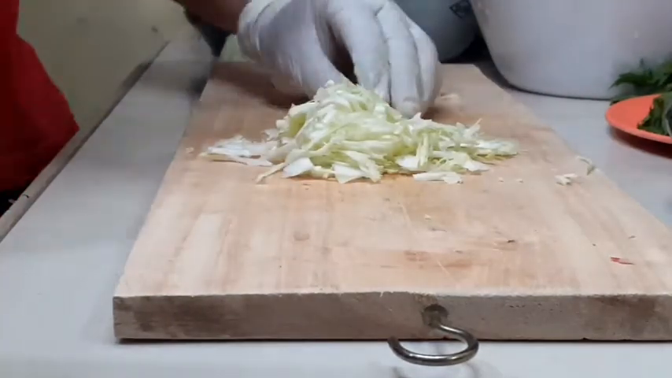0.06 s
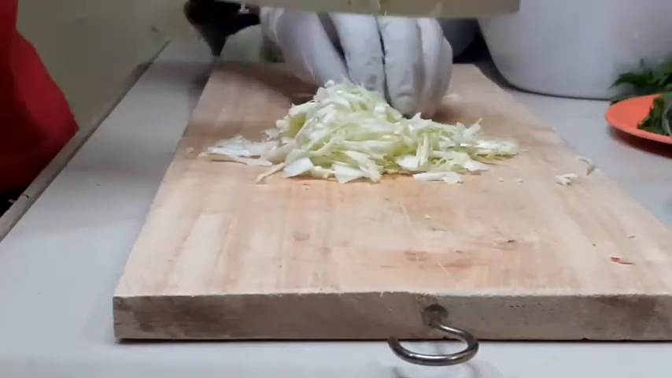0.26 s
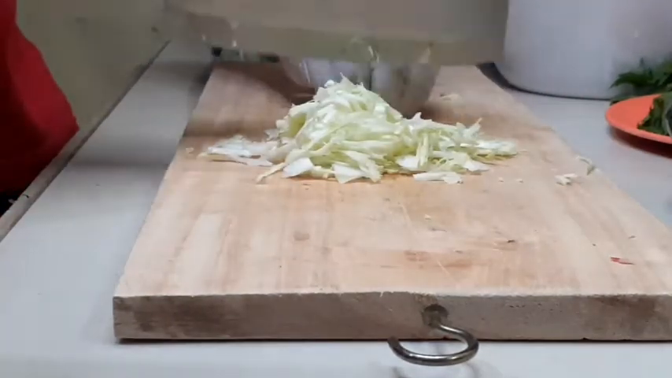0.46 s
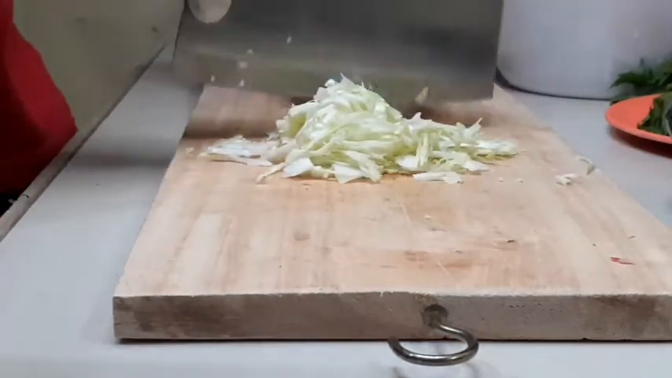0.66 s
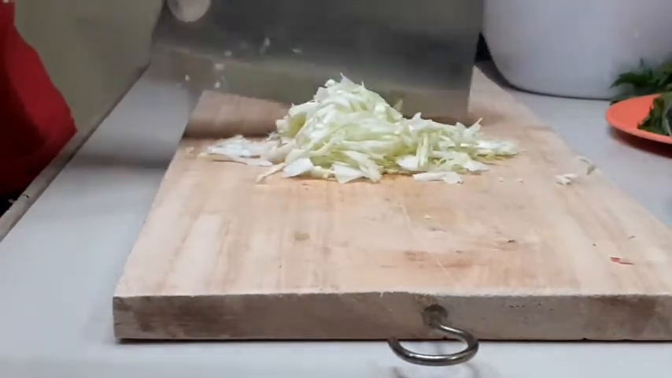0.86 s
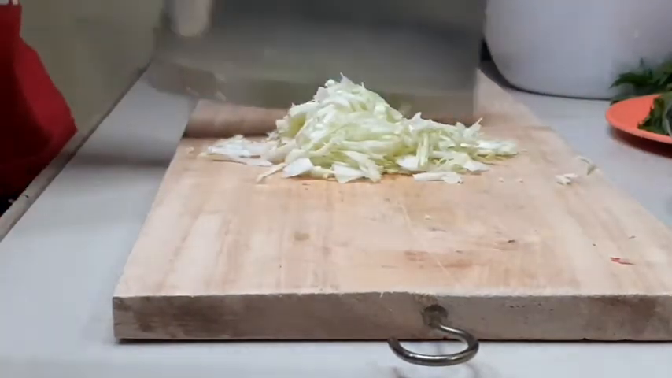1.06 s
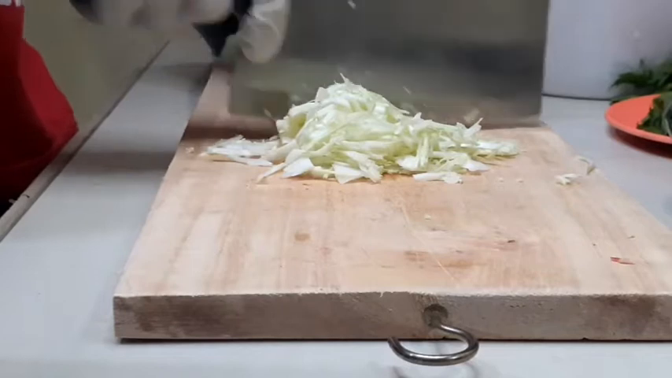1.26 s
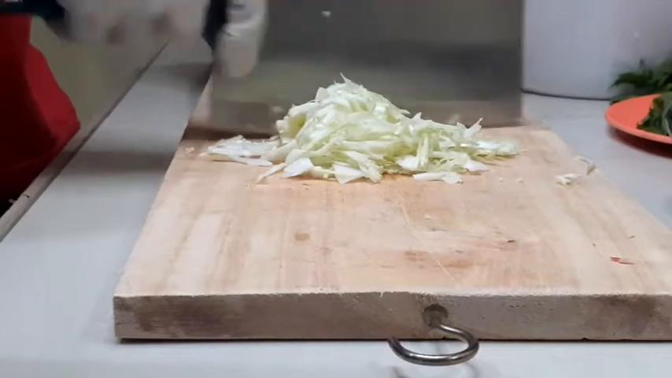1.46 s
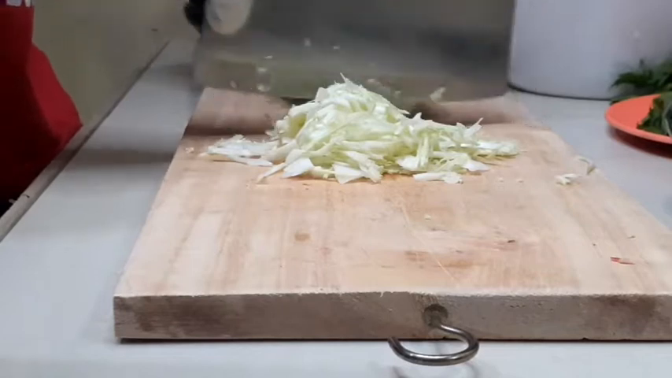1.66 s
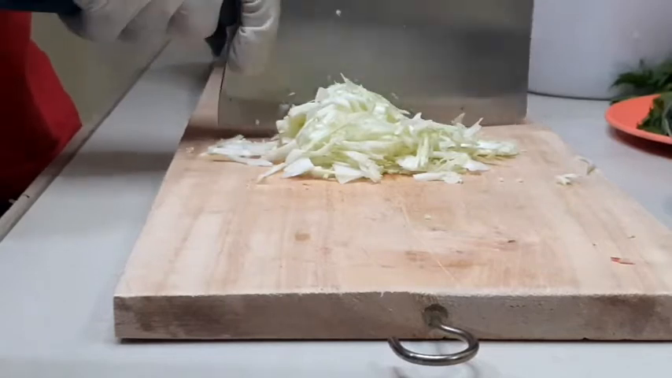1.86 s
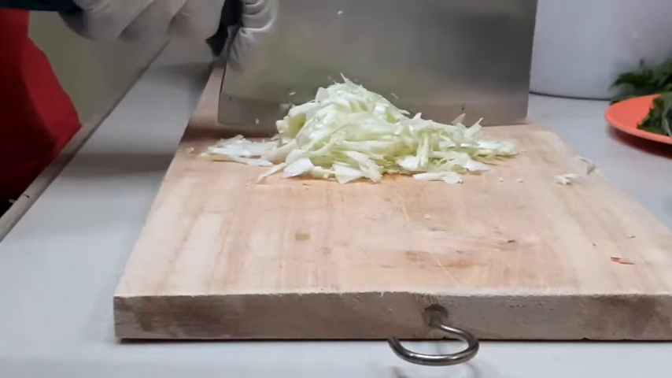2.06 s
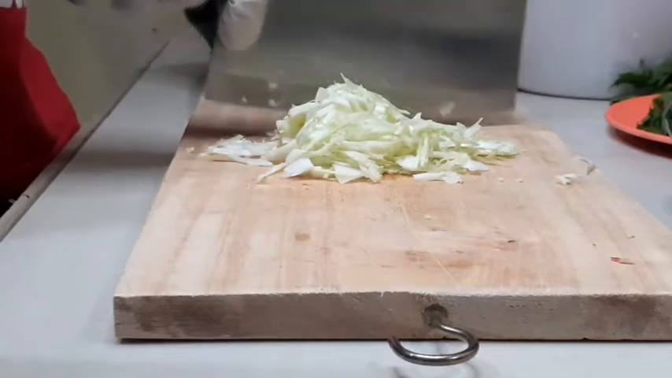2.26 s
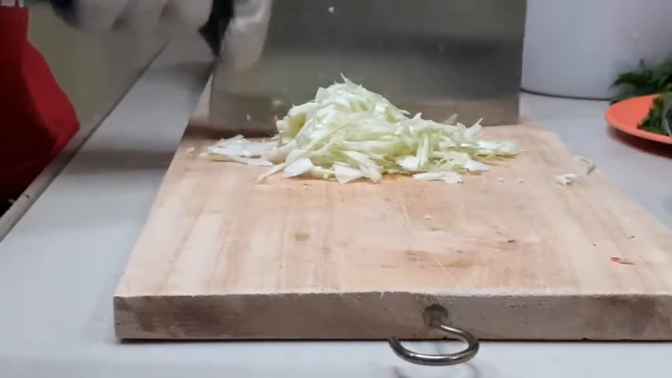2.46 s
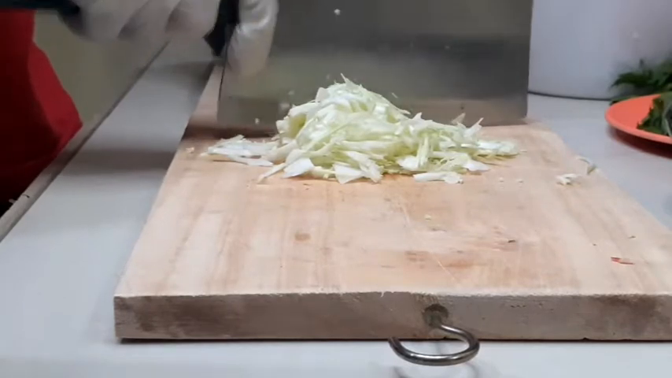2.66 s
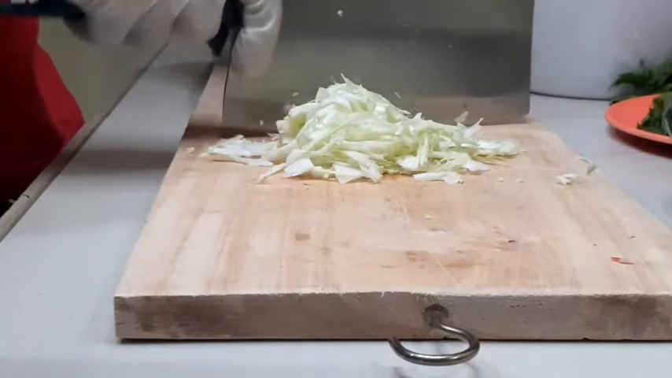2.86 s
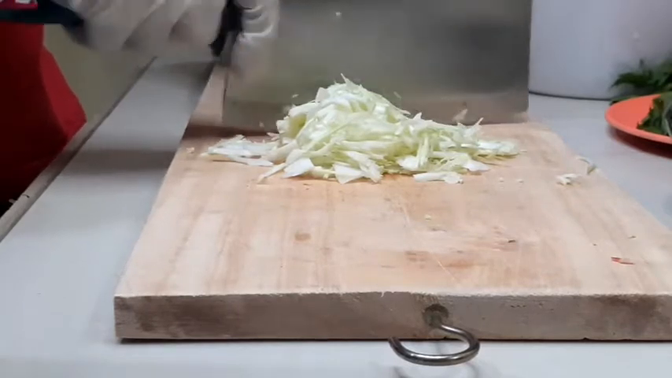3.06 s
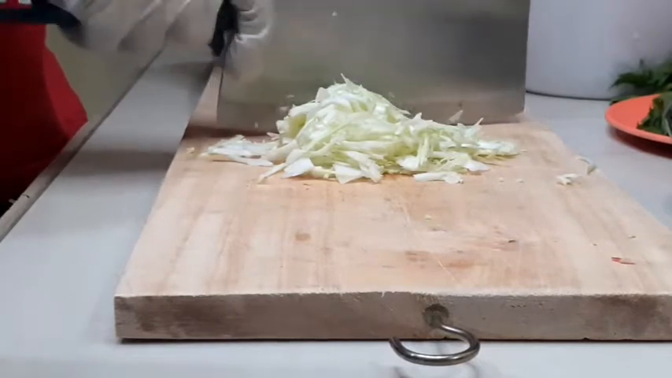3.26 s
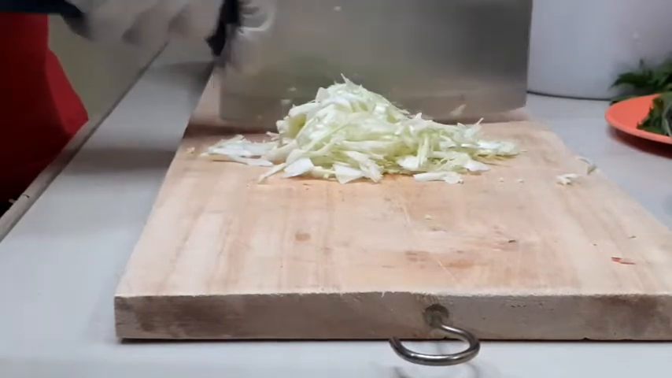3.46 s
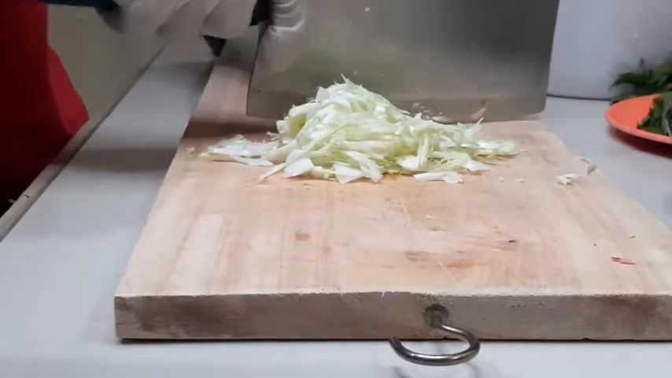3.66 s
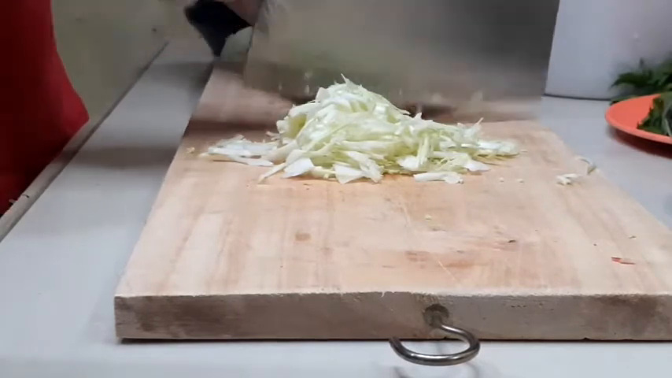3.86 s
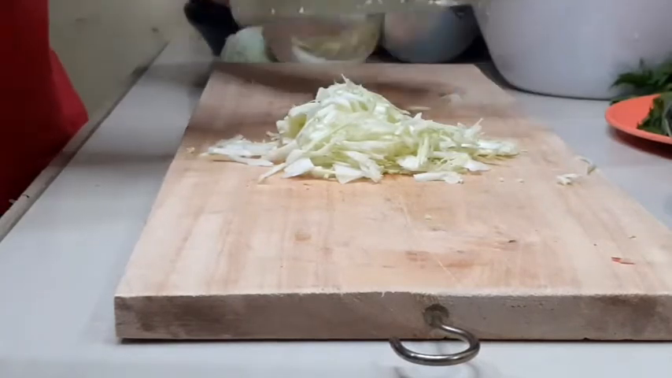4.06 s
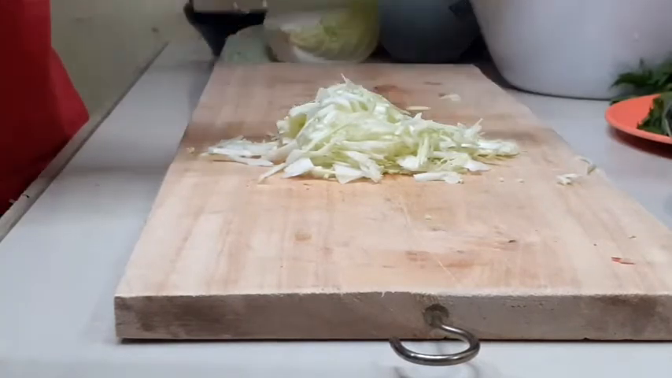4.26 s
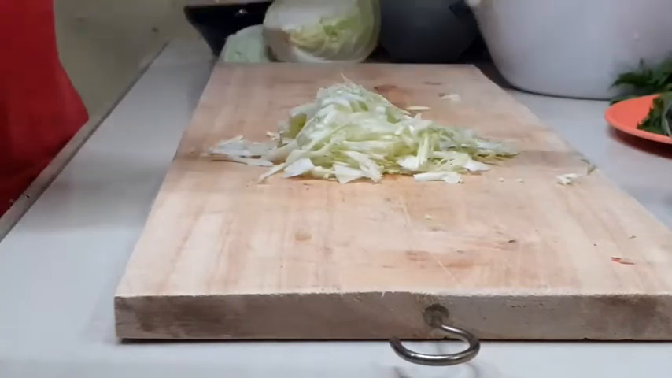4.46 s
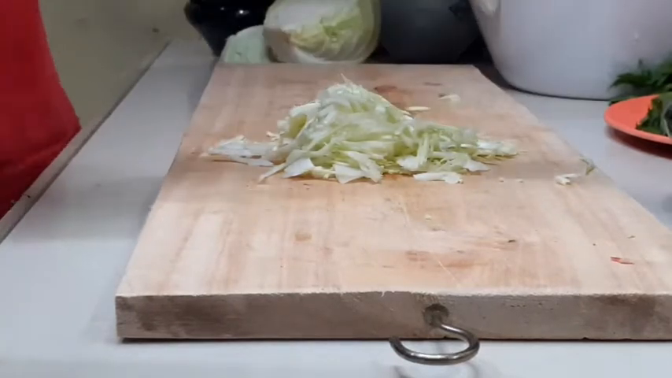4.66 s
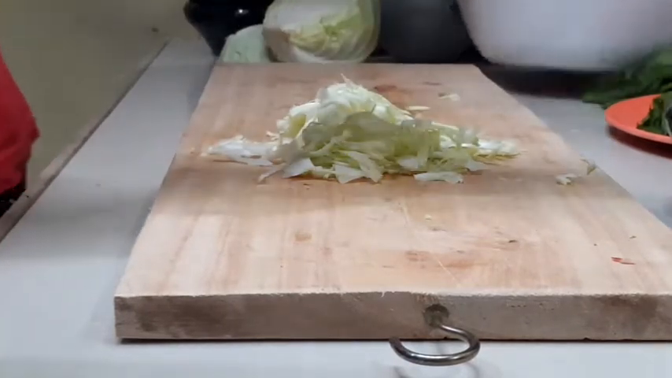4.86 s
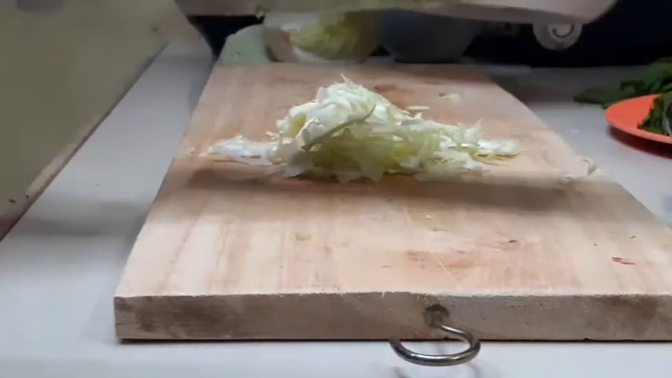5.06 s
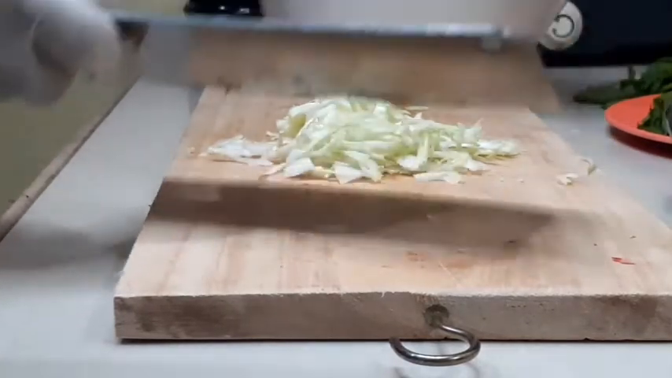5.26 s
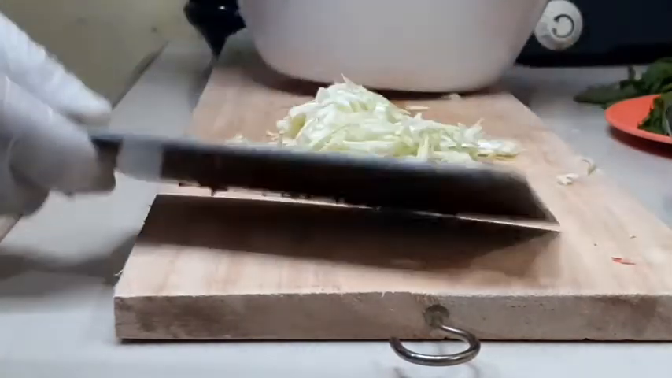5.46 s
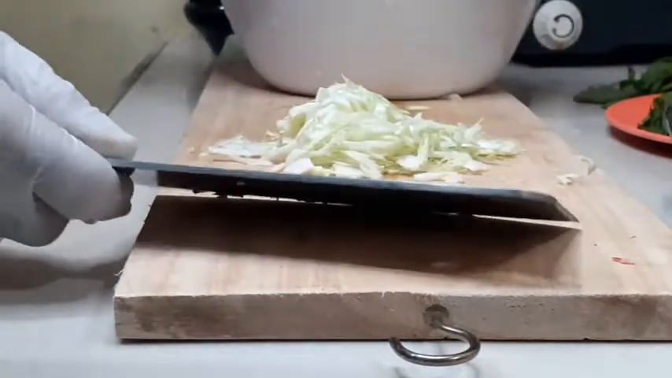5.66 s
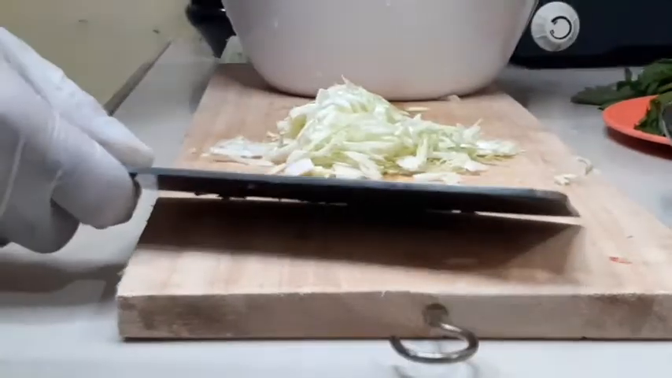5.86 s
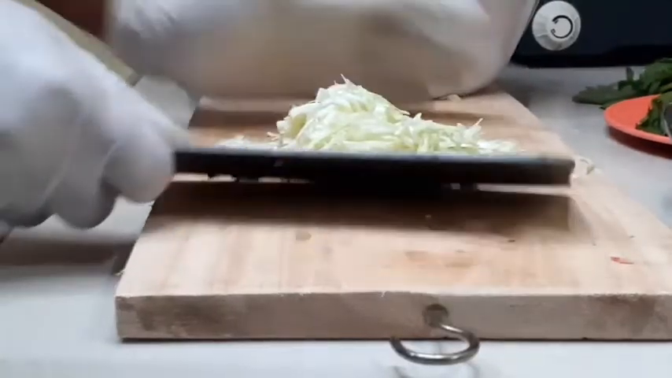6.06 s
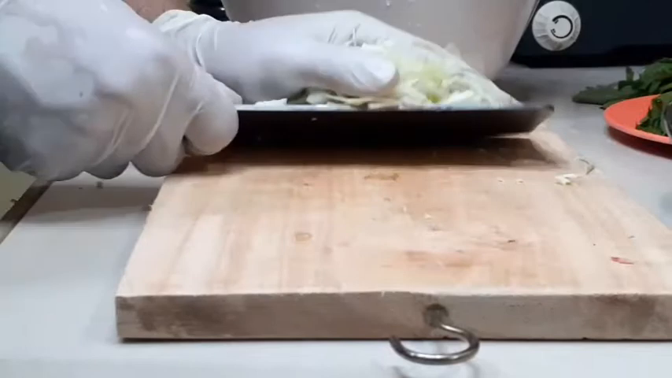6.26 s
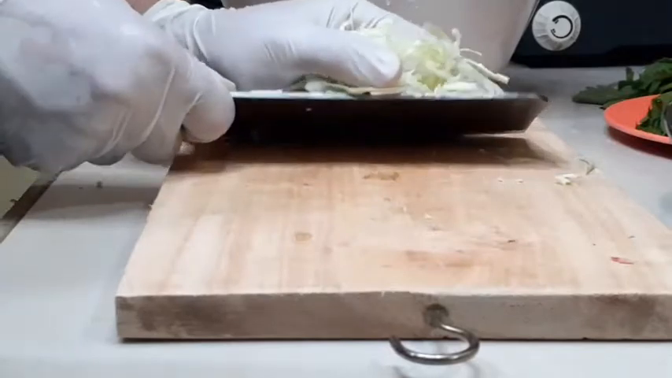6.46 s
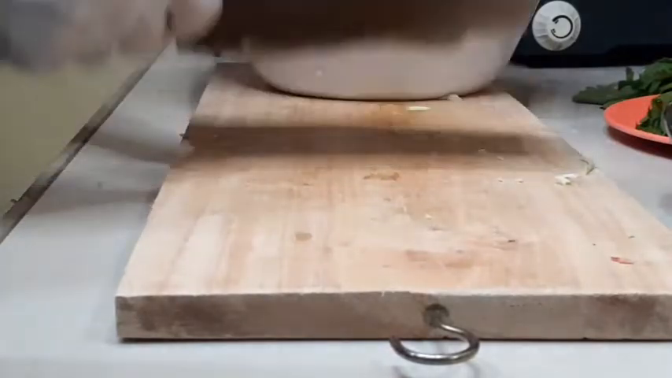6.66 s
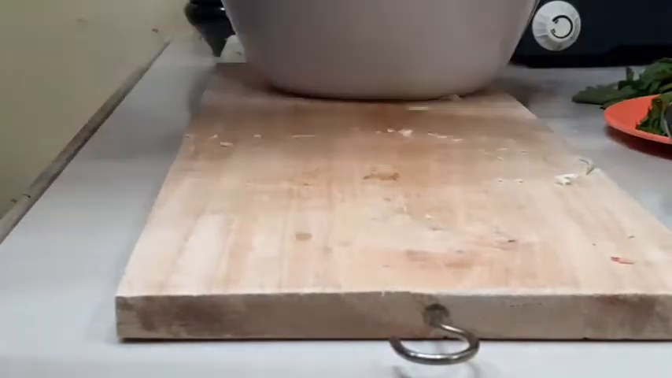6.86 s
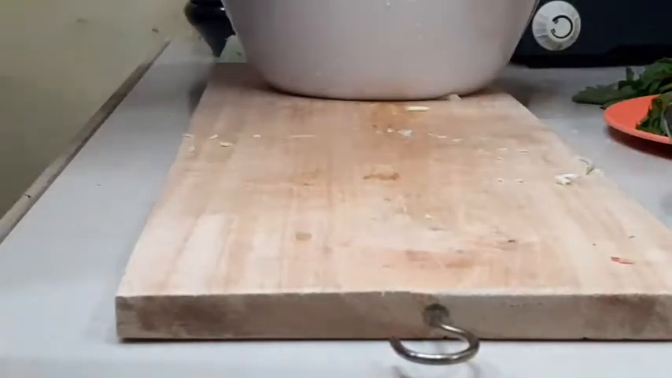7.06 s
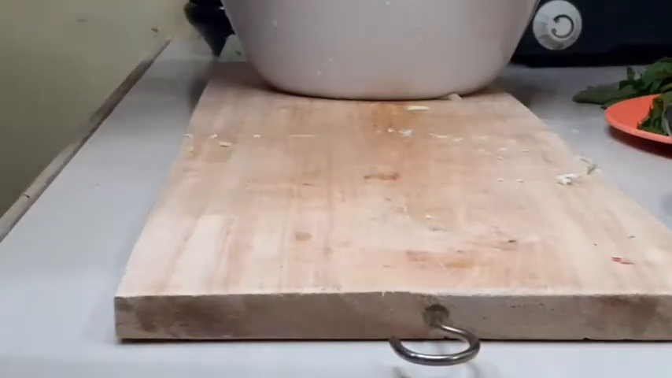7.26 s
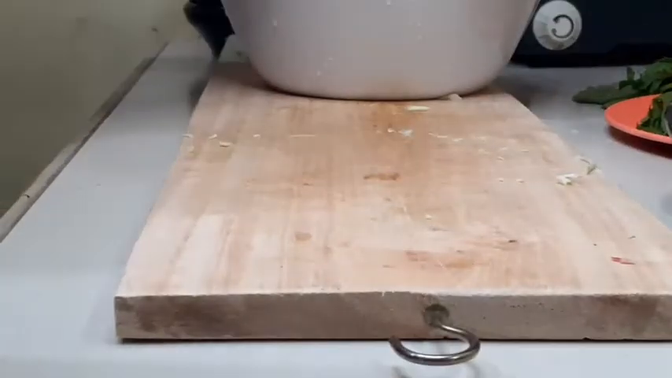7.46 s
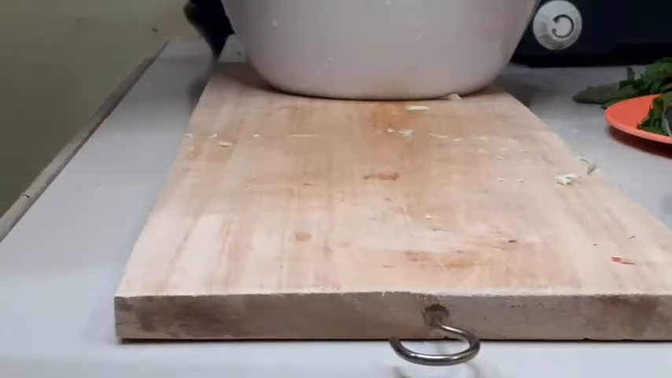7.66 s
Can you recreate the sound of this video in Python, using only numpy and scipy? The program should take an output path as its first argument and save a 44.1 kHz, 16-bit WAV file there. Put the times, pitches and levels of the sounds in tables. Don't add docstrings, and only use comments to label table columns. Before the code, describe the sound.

A hard-walled kitchen with low traffic rumble leaking in, heard close from the left of a wooden board. Around 0.8-0.95 s a glove squeaks faintly on steel. A heavy knife strikes at 1.05 s, loud and crunchy, with a soft touch just before, then at 1.4, 1.7, 2.3, 2.55, 2.75, a dull one at 3.0 and a heavy last chop at 3.2. Each is a short woody knock with leafy crackle and a brief room tail. Small crunches fade by 3.7. Leaves rustle at 4.3-4.6 over a low motor hum, strongest near 4.7. Flat steel clacks hard at 5.2, then more lightly at 5.5 with a rub. At 6.0-6.2 gritty blade scrapes and rustling gather the heap. A faint fan tone wavers, with a tiny high brake squeal near 7.0. Leaves drop in a ringing bowl at 7.35, a last clump at 7.55.

```python
import sys
import numpy as np
from scipy import signal
from scipy.fft import rfft, irfft, next_fast_len
from scipy.io import wavfile
from scipy.ndimage import uniform_filter1d

SR = 44100
rng = np.random.default_rng(int(sys.argv[2]) if len(sys.argv) > 2 else 0)


def pcm_store(signal):
    levels = np.round(np.clip(np.atleast_2d(signal), -1, 1) * 32767)
    wavfile.write(sys.argv[1], SR, levels.astype(np.int16).T)


def boost(x):
    u = np.asarray(x, float) / 20
    return 10 ** u


N = 340011
T = np.arange(N) / SR

# frequency in Hz, level in dB per Hz.
STREET_FLOOR = [(15, -54), (25, -28), (68, -5.5), (114, -5), (190, -7.5), (335, -2), (384, -27),
                (439, -13.5), (489, -17.5), (887, -35), (962, -42.5), (3160, -45.5), (8590, -42),
                (14800, -60), (16000, -70)]
STREET_FLOOR_DB = -61.5
# nearest in seconds, drone in dB, swell in seconds, rumble in dB, tyres in dB.
PASSING_VEHICLES = [(.28, -37.5, 0.22, -4, -38), (.4, -39.5, 0.21, -13, -30), (.56, -64.5, 0.1, 13.5, -3),
                    (.8, -53.5, 0.22, 5, -26), (1.0, -45.5, 0.11, -8, -10.5), (2.08, -61, 0.17, -14, 4.5),
                    (2.22, -41.5, 0.28, -5.5, -13.5), (3.75, -58, 0.62, 4, -2.5),
                    (3.98, -70.5, 0.51, -3.5, 7.5), (4.249, -57, 0.18, -0.5, -8),
                    (5.099, -52.5, 0.74, -3.5, -3.5), (5.95, -47, 0.23, -15.5, -21),
                    (6.5, -43.5, 0.41, -27, -19), (6.8, -48, 0.32, -4.5, -13), (7.1, -46, 1, -6, -12.5),
                    (7.599, -49, 0.2, 6, -15), (7.71, -54, 0.068, 17.5, -6)]
# rumble, drone, tyres, hiss in dB.
BETWEEN_VEHICLES_DB = (-56.5, -69.5, -87, -100)
# peak in seconds, level in dB, rise in seconds, fall in seconds.
DISTANT_HISSES = [(0.978, -69.5, 0.089, 0.65), (5.1, -80, 0.69, 0.47), (5.92, -68.5, 0.11, 0.12),
                  (6.6, -78, 1, 1), (7.2, -69.5, 1, 1)]
# peak in seconds, level in dB, rise in seconds, fall in seconds.
FAR_TYRES = [(0.321, -74, 0.15, .25), (.56, -81, .05, .05)]

# start in seconds, length in seconds, first Hz, last Hz, peak in dB.
GLOVE_SQUEAKS = [
    (0.788, 0.03, 3600, 4050, -71),
    (0.812, 0.055, 4080, 3550, -65),
    (0.872, 0.04, 3000, 2000, -73.5),
    (0.947, 0.04, 757, 850, -70.5),
]
GLOVE_OVERTONES_DB = (9.5, -9.5)
# start in seconds, peak in dB, length in ms, part under 3.5 kHz in dB.
LEAF_BURSTS = [(0.8782, -63, 56, -19), (0.945, -55.5, 22, 8), (1.025, -35, 62, -3.5),
               (1.345, -36.5, 59, 5.5), (1.368, -28.5, 14, -9.5), (1.604, -63, 130, -11),
               (1.653, -34, 47, 6.5), (1.658, -44, 4.8, 15), (2.301, -37, 30, 8), (2.5344, -31, 27, 0),
               (2.732, -26, 12, 7.5), (2.9598, -31.5, 29.4, 5), (3.171, -42.5, 24, -52),
               (3.36, -58, 45, -6.5), (3.385, -37.5, 13, 4.5), (3.442, -36.5, 5.6, -1),
               (3.709, -43.5, 9.4, 3.5), (4.3557, -48, 26, -3), (4.415, -39.5, 8.2, 0),
               (4.596, -37, 12, 1.5), (5.217, -22.5, 37, 8.5), (5.441, -35, 24, 14.5), (5.908, -54, 15, -6),
               (5.99, -47, 9.2, -1), (6.1043, -31, 8, 5.5), (6.21, -45, 8, -7), (6.4272, -60.5, 18, 2.5),
               (7.56, -58.5, 21, 22)]
# frequency in Hz, level in dB per Hz.
BURST_COLOUR = [(350, -27), (600, 11), (1030, 9), (1440, 4), (3120, -0.5), (6610, -7.5), (10200, -11.5),
                (14000, -10), (15800, -12.5), (16500, -37)]

# start in seconds, peak in dB, contact in ms, low modes in dB, high modes in dB.
KNIFE_KNOCKS = [
    (1.04, -24, 0.71, -30, 23),
    (1.051, 2, 0.69, -5.5, 15),
    (1.392, -5, 0.19, -1.5, 5),
    (1.684, -9, 0.2, -1, 2.5),
    (2.314, -4, 0.075, -5.5, 4.5),
    (2.546, 2, 0.11, -6.5, 9.5),
    (2.753, -8, 0.13, -1.5, 1),
    (2.99, -16, 0.31, 4.5, -11),
    (3.176, 3.5, 1, -8.5, 11.5),
]
# start in seconds, peak in dB, contact in ms,
# low modes in dB, high modes in dB.
STEEL_CLACKS = [
    (4.291, -41, 0.51, -16, 14),
    (5.218, 2, 0.12, -6.5, 4),
    (5.44, -25.5, 0.24, -2, 21.5),
    (5.474, -34, 0.2, -18, 5),
    (5.485, -8.5, 0.36, -6.5, 7),
    (7.331, -32, 0.34, -12, 5),
    (7.56, -46, 0.5, -27, 5),
]
# frequency in Hz, level in dB, t60 in seconds.
BOARD_MODES = [(108, -17.5, 0.11), (150, -17, 0.046), (198.5, -10.5, 0.028), (301, 2, 0.049),
               (376, -5, 0.062), (442, -2, 0.051), (552, -4, 0.055), (609.4, -5, 0.043), (736, -4, 0.05),
               (795, -5.5, 0.044), (883, 0.5, 0.029), (970, -5.5, 0.04), (1112, -4, 0.023),
               (1274, -10, 0.035), (1400, -11, 0.03), (1600, -9.5, 0.025), (1676, -12.5, 0.03),
               (1864, -13.5, 0.015), (2205, -11.5, 0.0066), (3050, -14.5, 0.0045), (4400, -14.5, 0.0013)]
# frequency in Hz, level in dB, t60 in seconds.
STEEL_MODES = [(107.4, -25.5, 0.166), (198, -13, 0.08), (303, -1, 0.029), (365, -3, 0.084),
               (439, -6.5, 0.038), (577, 4, 0.024), (688, -4, 0.033), (724, -8, 0.032), (897, -22, 0.023),
               (1278, -7.5, 0.016), (1570, -40, 0.0162), (1770, -15.5, 0.04), (2490, -15.5, 0.011),
               (3100, -10, 0.0044), (3600, -15.5, 0.017), (4140, -21, 0.0077), (6550, -26.5, 0.0018),
               (11700, -26.5, 0.00092)]
CONTACT_RISE_S = 0.0003
SETTLE_S, SETTLE_DB = 0.025, -4.5

# time in seconds, upper orders in dB.
MOTOR_LOAD = [(3.298, -86), (3.7, -59), (4.001, -63), (4.2, -52.5), (4.43, -57), (4.68, -53), (4.95, -64),
              (5.2, -64.5), (5.801, -80)]
# multiple of the turning rate, level in dB.
MOTOR_UPPER_ORDERS = [(2, 1.5), (3, -3.5), (4, 3), (6, -16.5), (8, -11)]
# peak in seconds, level in dB, rise in seconds, fall in seconds.
MOTOR_FIRST_ORDER = [
    (4.05, -57, 0.64, 0.36),
    (4.75, -46, 0.65, 0.57),
    (5.3, -58, 0.49, .7),
]
MOTOR_HZ = 53.9

TOUCH_TIMES_S = [3.3, 3.443, 4.276, 4.277, 4.292, 4.293, 4.598, 4.599, 5.474, 5.485, 5.486, 5.49, 5.517,
                 6.022, 6.118, 7.332, 7.343, 7.56, 7.561, 7.562]
# frequency in Hz, level in dB, t60 in seconds.
TOUCH_NOTES = [(1630, -41.5, 0.025), (3940, -60.5, .03), (1150, -54, 0.016), (2030, -59, 0.022),
               (1307, -48.5, 0.15), (655, -45, 0.026), (2100, -45, 0.023), (2670, -45, 0.014),
               (579, -22, 0.027), (610, -14, 0.029), (364, -16, 0.046), (2430, -37, 0.098),
               (481.48, -16, 0.014), (1210, -39, 0.082), (883, -40, 0.14), (1125, -47, .04),
               (2130, -44, 0.028), (1160, -60, 0.041), (1900, -43, 0.033), (2400, -42.5, 0.049)]

# frequency in Hz, level in dB per Hz.
RUSTLE_COLOUR = [(1760, -32), (3000, -19.5), (3740, 0.5), (4740, -10.5), (5400, -4.5), (10400, -8),
                 (13600, -7), (14800, -3), (16200, -2), (16500, -32)]
# peak in seconds, level in dB, rise in seconds, fall in seconds.
LEAF_PUSHES = [(4.37, -53.5, 0.12, 0.086), (4.444, -47, 0.091, 0.06), (4.531, -39.5, 0.12, 0.08),
               (4.62, -62.5, .04, 0.34), (5.443, -40, 0.0071, 0.047), (5.491, -33.5, 0.021, 0.077),
               (5.80, -66.5, 0.04, 0.089), (5.99, -53.5, 0.08, .05), (6.05, -45.5, 0.091, 0.078),
               (6.09, -50.5, 0.036, .04), (6.12, -41.5, 0.065, 0.063), (6.165, -45.5, 0.057, .05),
               (6.2, -45.5, 0.086, 0.019), (7.373, -49.5, 0.045, 0.061), (7.7, -68.5, 0.085, .05)]
# peak in seconds, level in dB, fall in seconds, thrum in dB, steel in dB.
BOARD_RUBS = [(4.297, -53, 0.02, 16, -1.5), (4.38, -70, 0.14, 18.5, 5), (4.45, -70.5, 0.16, 20, 9.5),
              (4.53, -69, 0.18, -1, 15), (4.608, -61.5, 0.033, 20.5, 16.5), (4.68, -64.5, 0.07, 17, 4),
              (5.447, -30, 0.0081, 12.5, 0.5), (5.507, -43.5, 0.051, 1, 11.5), (5.54, -38, 0.11, 0, -3),
              (6.03, -44.5, 0.1, 0.5, -10.5), (6.06, -36.5, 0.055, -5, -15.5), (6.135, -41, 0.056, 2.5, -7),
              (6.201, -68.5, 0.1, 26, 6), (7.35, -53.5, 0.037, 11, 9.5), (7.387, -54, 0.046, 10.5, 13),
              (7.44, -48, 0.096, -0.5, -3), (7.572, -53.5, 0.126, 5, 0.5), (7.7, -63.5, 0.061, -10, 1.5)]
RUB_RISE = 0.9
# frequency in Hz, width in Hz, level in dB.
BLADE_PEAKS = [(292, 4.2, 10), (320.4, 6.4, 9), (598, 67, -3), (866.6, 12, -0.5), (1100, 37, -21),
               (1393, 92, -7), (1602, 110, -10.5), (2120, 34, -19), (2524, 60, -19), (3193, 88, -21.5),
               (3870, 210, -22), (3980, 23, -27), (5400, 394, -24.5), (6860, 400, -28)]
# frequency in Hz, width in Hz, level in dB.
BOWL_PEAKS = [(463.6, 61, 2.5), (1165, 58, 4), (1960, 40, -6), (2050, 34.5, -6.5), (2200, 170, -6),
              (2434, 71, -3), (3380, 60, -24), (5110, 74, -35)]
# peak in seconds, level in dB, rise in seconds, fall in seconds.
SCRAPING_STROKES = [
    (5.995, -34.5, 0.036, 0.055),
    (6.04, -33, 0.089, 0.13),
    (6.135, -35.5, 0.12, 0.076),
    (6.19, -51.5, 0.037, 0.033),
]
# peak in seconds, level in dB, rise in seconds, fall in seconds.
LEAF_FALLS = [
    (7.343, -33.5, 0.01, 0.069),
    (7.385, -60, .04, 0.069),
    (7.461, -49.5, 0.042, 0.19),
    (7.562, -40, 0.0039, 0.064),
]

# peak in seconds, level in dB, rise in seconds, fall in seconds.
FAR_FAN = [
    (5.95, -50.5, 0.2, .4),
    (6.45, -68.5, 0.45, 0.2),
    (6.85, -52, 0.71, 0.39),
    (7.15, -62, .3, 0.45),
]
FAN_HZ = 325
# first frequency in Hz, level in dB.
BRAKE_LINES = [(11900, -79), (13330, -69)]
BRAKE_SPAN_S = (6.96, 7.15)
BRAKE_SAG, BRAKE_HALO_DB = 0.02, -86

# frequency in Hz, t60 in seconds, wet level in dB, likeness of the two ports 0-1.
KITCHEN_BANDS = [(97, 0.73, 7, 0.99), (183, 0.92, -0.5, 1), (368.5, 0.46, 0, 0.4), (710, 0.52, 0, 0.5),
                 (980, .5, 2, 0), (1430, 0.47, -2, 0), (2170, 0.4, 3, 0), (3040, 0.34, 5, 0.07),
                 (4240, 0.29, 3, 0), (6040, 0.33, 0.5, 0.01), (10300, 0.37, -2.5, 0),
                 (14910, 0.48, -7, 0.04)]
# frequency in Hz, peak gain in dB, t60 in seconds.
STANDING_NOTES = [(104.6, 2, .6), (122, 3, 0.8), (288.7, 6, 0.81), (365.6, 8.5, .45), (463, 1, 0.24),
                  (611, 1.5, 0.22), (795, 7.5, .35), (865, 4, .35), (953, 3.5, .3), (1152, 5.5, .3),
                  (1214, 3.5, .3)]
EARLY_T60_S, EARLY_DB = 0.054, -4
TAIL_BUILD_S = 0.0058
NEW_SPOTS_S = [0, 1.33, 1.6, 2.28, 2.52, 2.72, 2.95, 3.165, 3.35, 3.7, 4.1, 4.35, 4.42, 4.5, 4.56, 5.2,
               5.43, 5.47, 5.76, 5.98, 6.04, 6.1, 6.16, 6.4, 7.3, 7.36, 7.42, 7.55]
# time in seconds, room in dB.
ROOM_SHARE = [(0, 0.5), (4, 0.5), (4.1, 0.5), (5.1, -3), (5.2, 2.5), (5.4, 5), (5.46, -5), (5.7, -1.5),
              (6.4, -3.5), (7.3, 1)]

# frequency in Hz, difference in dB.
PORT_BALANCE = [(100, -4.5), (4000, -5), (8000, -7.5), (13000, 0.5)]
PORT_LAG = 1
MIC_LOW_HZ, MIC_TOP_HZ = 48.5, 16290


def colour(x, points):
    size = next_fast_len(x.shape[-1])
    hz, db = np.transpose(points)
    log_hz = np.log(np.maximum(np.arange(size // 2 + 1) * SR / size, 1))
    gain = boost(np.interp(log_hz, np.log(hz), db))
    return irfft(rfft(x, size) * gain, size)[..., :x.shape[-1]]


def band(x, lo_hz, hi_hz, order=2):
    sos = signal.butter(order, [lo_hz, min(hi_hz, 0.45 * SR)], "band", fs=SR, output="sos")
    y = signal.sosfilt(sos, x)
    return y / np.sqrt(np.mean(y ** 2))


def pair(likeness, size=N):
    mid, side = rng.standard_normal((2, size))
    c = np.clip(likeness, 0, 1)
    sides = np.array([[1], [-1]])
    return (np.sqrt(1 + c) * mid + np.sqrt(1 - c) * side * sides) / np.sqrt(2)


def walk(rate):
    hold = int(SR / rate)
    steps = np.repeat(rng.standard_normal(N // hold + 1), hold)
    return 1.4 * uniform_filter1d(uniform_filter1d(steps, hold), hold)[:N]


def grains(spread_db):
    return rng.standard_normal(N) * boost(spread_db * rng.exponential(size=N))


def swells(s, db, rise_s, fall_s):
    power, t = 1e-18, T[::32]
    for at, top_db, rise, fall in np.broadcast(s, db, rise_s, fall_s):
        away = np.where(t < at, (at - t) / max(rise, 0.002), (t - at) / max(fall, 0.002))
        power = power + boost(2 * top_db - 40 * np.minimum(away, 10))
    return np.interp(T, t, np.sqrt(power))


def street():
    s, db, swell, low_db, high_db = np.transpose(PASSING_VEHICLES)
    gains = [swells(s, db + d, swell, swell) for d in (low_db, 0, high_db)]
    gains.append(swells(*np.transpose(DISTANT_HISSES)))
    levels = [20 * np.log10(np.hypot(g, boost(quiet))) for g, quiet in zip(gains, BETWEEN_VEHICLES_DB)]
    rumble_db, drone_db, tyre_db, hiss_db = levels
    floor = colour(pair(0.97), STREET_FLOOR)
    floor = boost(STREET_FLOOR_DB) * floor / floor.std()
    rumble = band(pair(0.79), 54, 160) + band(pair(0.85), 88, 130)
    rumble = boost(rumble_db - 2.5 + 2.0 * walk(19.0)) * rumble
    drone = band(pair(0.22), 200, 420, order=4) + band(pair(0.55), 310, 345)
    drone = boost(drone_db - 11.5 + 1.9 * walk(13.0)) * drone
    tyres = boost(tyre_db - 8.0 + 1.4 * walk(3.9)) * band(pair(0.39), 270, 1100)
    hiss = boost(hiss_db) * (band(pair(0.28), 3500, 3950) + 0.9 * band(pair(0.27), 2700, 6300))
    far_tyres = swells(*np.transpose(FAR_TYRES)) * band(pair(0.4), 1000, 1800, order=3)
    mic_hiss = boost(-84.0) * band(pair(0.1), 5000, 22000)
    return mic_hiss + floor + rumble + drone + tyres + hiss + far_tyres


def squeaks():
    out, rough = 0, 0.6 + band(rng.standard_normal(N), 20, 220)
    for start, length, first_hz, last_hz, db in GLOVE_SQUEAKS:
        u = np.clip((T - start) / length, 0, 1)
        phase = 2 * np.pi * np.cumsum(first_hz + (last_hz - first_hz) * u) / SR
        over_db = GLOVE_OVERTONES_DB[first_hz > 1500]
        overtones = np.sin(2 * phase) + 0.6 * np.sin(3 * phase)
        out = out + boost(db) * np.sin(np.pi * u) * (np.sin(phase) + boost(over_db) * overtones)
    return out * rough


def crunches():
    leaf = colour(grains(2.6), BURST_COLOUR)
    bright, dull = band(leaf, 3500, 20000), band(leaf, 1200, 3000)
    out = np.zeros(N)
    for s, db, ms, dull_db in LEAF_BURSTS:
        at, size = int(s * SR), int(3 * ms * SR / 1000)
        part = slice(at, at + size)
        u = np.arange(size) / size
        shape = np.minimum(np.arange(size) / 180, 1) * (1 - u) ** 2.1
        crackle = bright[part] + boost(dull_db) * np.sqrt(u + 0.28) * dull[part]
        out[part] += boost(db - 10.5) * shape * crackle
    return out


def blows(table, modes):
    out, t = np.zeros(N + SR), np.arange(SR // 4) / SR
    hz, db, t60 = (column[:, None] for column in np.transpose(modes))
    sign = (-1.) ** np.arange(len(modes))[:, None]
    chance = rng.standard_normal((len(table), 2 * len(modes)))
    for (s, peak_db, ms, low_db, high_db), row in zip(table, chance):
        size, detune = row.reshape(2, -1, 1)
        spot_db = np.interp(np.log(hz), np.log([300, 800, 2500]), [low_db, 0, high_db]) + size
        tones = np.sin(2 * np.pi * hz * (1 + 0.005 * detune) * t)
        ring = np.sum(sign * boost(db + spot_db - 60 * t / t60) * tones, axis=0)
        push = np.exp(-np.arange(256) / (SR * max(ms, 0.02) / 1000 / np.pi))
        ring = np.convolve(ring, push / push.sum())[:len(t)]
        ring = ring * (1 - np.exp(-t / CONTACT_RISE_S)) ** 2
        ring = ring * boost(SETTLE_DB * np.clip((t - SETTLE_S) / 0.0026, 0, 1))
        at = int(s * SR)
        out[at:at + len(t)] += boost(peak_db - 8.5) * ring
    return out[:N]


def knocks():
    return blows(KNIFE_KNOCKS, BOARD_MODES)


def motor():
    s, db = np.transpose(MOTOR_LOAD)
    phase = 2 * np.pi * np.cumsum(MOTOR_HZ * (1 + 0.0024 * walk(6.1))) / SR
    hum = sum(boost(order_db + 1.5 * walk(5)) * np.sin(k * phase) for k, order_db in MOTOR_UPPER_ORDERS)
    first = swells(*np.transpose(MOTOR_FIRST_ORDER)) * np.sin(phase)
    return boost(np.interp(T, s, db)) * hum + first


def taps():
    out = np.zeros(N)
    for s, (hz, db, t60) in zip(TOUCH_TIMES_S, TOUCH_NOTES):
        t = np.maximum(T - s, 0)
        decay = boost(db - 60 * np.minimum(t / t60, 4)) * (t < 4 * t60)
        out += decay * np.sin(2 * np.pi * hz * t)
    return out


def clacks():
    return blows(STEEL_CLACKS, STEEL_MODES)


def rubbed(slips, modes, lo_hz, hi_hz, grit):
    t = np.arange(SR // 8) / SR
    ring = sum(boost(db - 60 * t / t60) * np.sin(2 * np.pi * hz * t) for hz, db, t60 in modes)
    return band(signal.fftconvolve(slips, ring)[:N], lo_hz, hi_hz) + grit * band(slips, lo_hz, hi_hz)


def modes_of(peaks):
    return [(hz, db + 20 * np.log10(width), np.log(1000) / np.pi / width) for hz, width, db in peaks]


def sweeps():
    rustle = band(colour(grains(2.4), RUSTLE_COLOUR), 5900, 20000)
    slips = [grains(3.18) for _ in range(3)]
    thrum = rubbed(slips[0], BOARD_MODES, 210, 677, 0.39)
    wood = rubbed(slips[1], BOARD_MODES, 1120, 1410, 0.86)
    steel = rubbed(slips[2], STEEL_MODES, 1310, 3900, 1.625)
    blade = rubbed(slips[1], modes_of(BLADE_PEAKS), 71, 9300, 0.069)
    bowl = rubbed(slips[2], modes_of(BOWL_PEAKS), 270, 7500, 0.11)
    s, db, fall, thrum_db, steel_db = np.transpose(BOARD_RUBS)
    rise = RUB_RISE * fall
    out = swells(*np.transpose(LEAF_PUSHES)) * rustle
    out += swells(s, db + thrum_db, rise, fall) * thrum
    out += swells(s, db, rise, fall) * wood
    out += swells(s, db + steel_db, rise, fall) * steel
    out += swells(*np.transpose(SCRAPING_STROKES)) * blade
    out += swells(*np.transpose(LEAF_FALLS)) * bowl
    return out * boost(1.8 * walk(60) - 7)


def far_fan():
    phase = 2 * np.pi * np.cumsum(FAN_HZ * (1 + 0.0042 * walk(1.8))) / SR
    return swells(*np.transpose(FAR_FAN)) * np.sin(phase)


def brake_squeal():
    start, end = BRAKE_SPAN_S
    on = np.clip(np.minimum(T - start, end - T) / 0.07, 0, 1)
    sag = 1 - BRAKE_SAG * np.clip((T - start) / (end - start), 0, 1) ** 2
    squeal = boost(BRAKE_HALO_DB) * band(rng.standard_normal(N), 11000, 13800)
    for hz, db in BRAKE_LINES:
        squeal = squeal + boost(db + 2.5 * walk(60)) * np.sin(2 * np.pi * np.cumsum(hz * sag) / SR)
    return on * squeal


def kitchen(x, spot_db):
    t = np.arange(int(0.6 * SR)) / SR
    response = np.zeros((2, len(t)))
    centres = np.array([row[0] for row in KITCHEN_BANDS])
    edges = np.r_[centres[0] / np.sqrt(2), np.sqrt(centres[1:] * centres[:-1]), 0.45 * SR]
    for (hz, t60, wet_db, likeness), lo_hz, hi_hz in zip(KITCHEN_BANDS, edges, edges[1:]):
        noise = band(pair(likeness, size=len(t)), lo_hz, hi_hz) * np.minimum(t / 0.00029, 1)
        for db, decay, build in ((wet_db, t60, TAIL_BUILD_S), (EARLY_DB, EARLY_T60_S, 0.001)):
            part = noise * boost(-60 * t / decay) * (1 - np.exp(-t / build))
            share = 2 * (hi_hz - lo_hz) / SR
            response += boost(db + spot_db) * part * np.sqrt(share / np.sum(part ** 2, axis=1, keepdims=True))
    fill = 1 - np.exp(-t / TAIL_BUILD_S)
    for hz, db, t60 in STANDING_NOTES:
        skew = min(hz / 1400, 0.8) * np.array([[1], [-1]])
        note = boost(db + spot_db - 60 * t / t60) * fill * np.sin(2 * np.pi * hz * t + skew)
        response += note * 2 * np.log(1000) / t60 / SR
    response[0, 0] += 1
    response[1, PORT_LAG] += 1
    return signal.fftconvolve(x[None], response, axes=1)


def scene():
    near = squeaks() + crunches() + knocks() + taps() + clacks() + sweeps()
    out = np.zeros((2, N + SR))
    edges = [int(s * SR) for s in NEW_SPOTS_S] + [N]
    for a, b in zip(edges, edges[1:]):
        heard = kitchen(near[a:b], np.interp(a / SR, *np.transpose(ROOM_SHARE)))
        out[:, a:a + heard.shape[1]] += heard
    return out[:, :N] + street() + motor() + far_fan() + brake_squeal()


def band_limit(x):
    return signal.sosfilt(signal.butter(12, 16290, fs=SR, output="sos"), x)


def record(dry):
    ports = np.array([colour(dry[k], [(hz, sign * db / 2) for hz, db in PORT_BALANCE])
                      for k, sign in enumerate((1, -1))])
    low_cut = signal.butter(4, MIC_LOW_HZ, "high", fs=SR, output="sos")
    ports = signal.sosfilt(low_cut, ports)
    ports = np.tanh(ports / 2) * 2
    top_cut = signal.ellip(12, 0.2, 90, MIC_TOP_HZ, fs=SR, output="sos")
    ports = signal.sosfilt(top_cut, ports)
    return band_limit(ports)


dry = scene()
out = record(dry)
pcm_store(out)
```